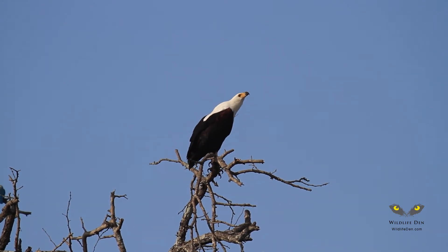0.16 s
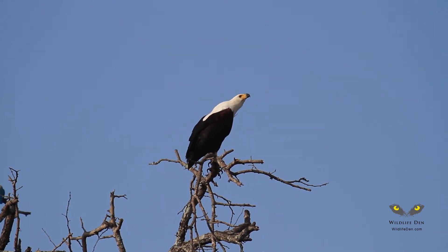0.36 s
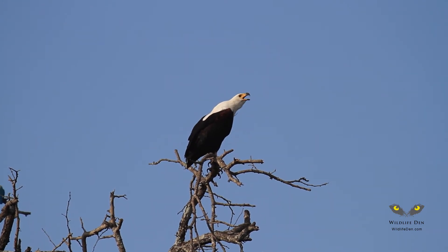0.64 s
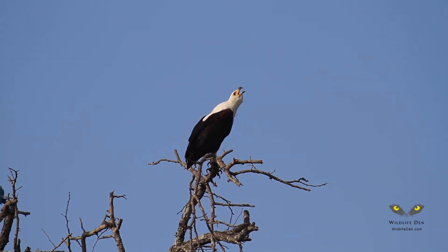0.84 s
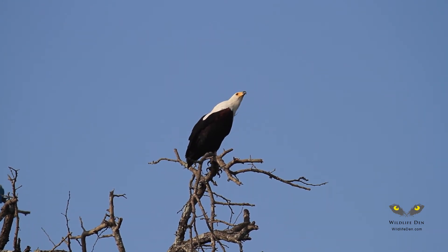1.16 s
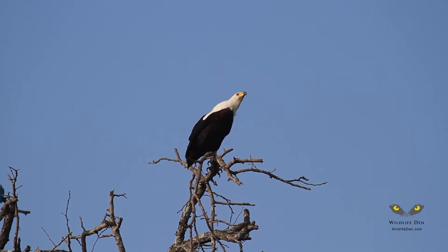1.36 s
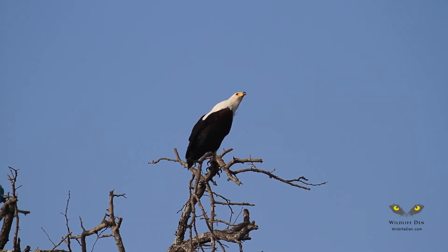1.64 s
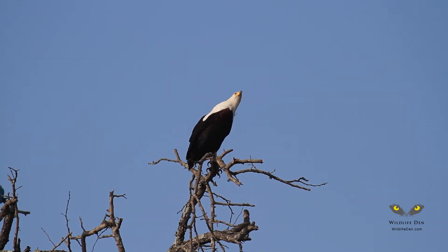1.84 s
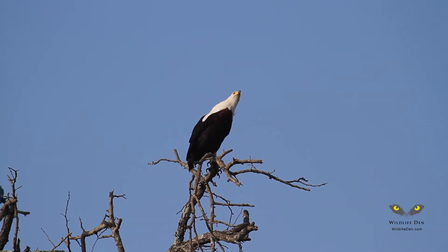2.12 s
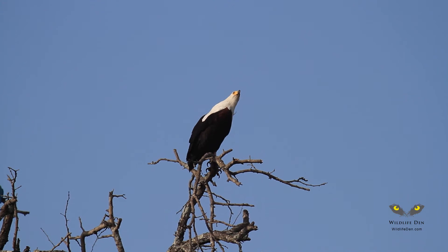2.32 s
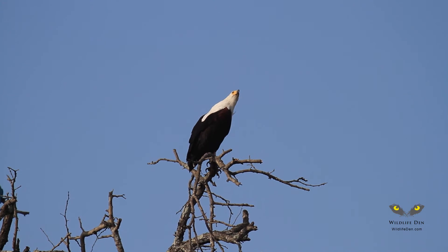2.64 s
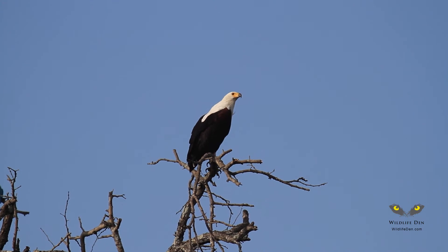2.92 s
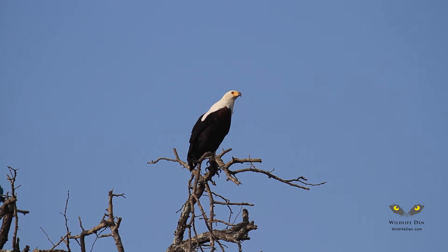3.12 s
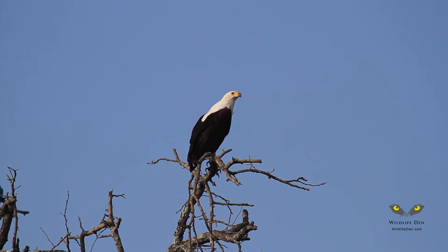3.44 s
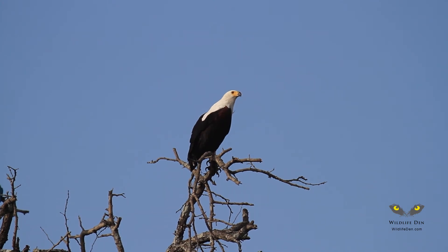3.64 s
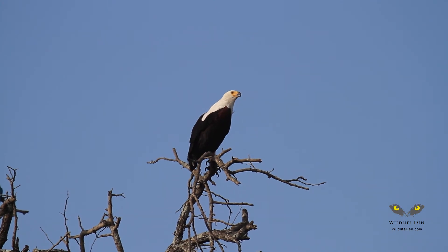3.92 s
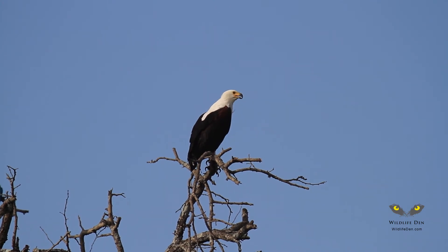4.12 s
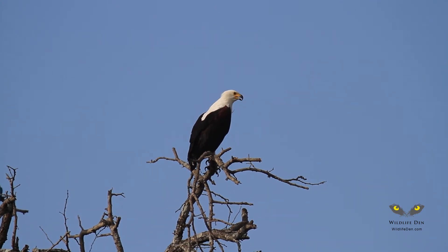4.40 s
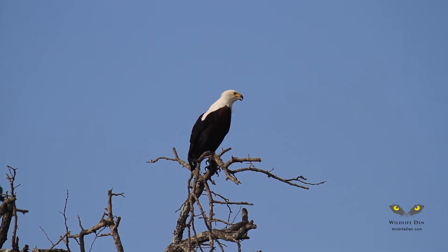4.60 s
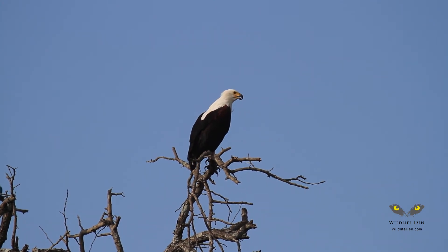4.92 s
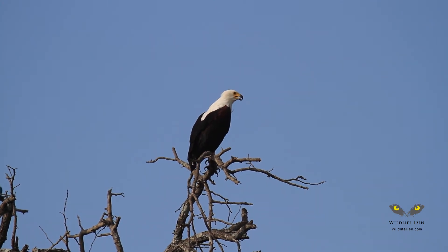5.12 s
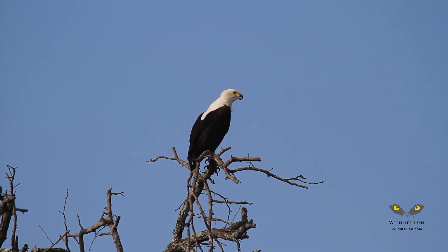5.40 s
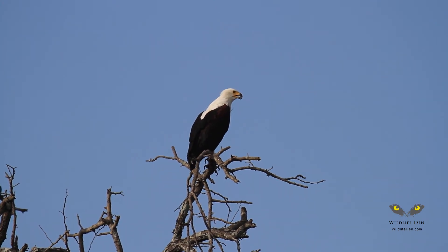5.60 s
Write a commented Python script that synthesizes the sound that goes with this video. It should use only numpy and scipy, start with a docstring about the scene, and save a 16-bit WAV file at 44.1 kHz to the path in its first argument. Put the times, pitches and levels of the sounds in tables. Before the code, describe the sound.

Outdoors in dry woodland, a close fish eagle gives a loud, raspy falling yelp at once, overlapped by its mate's higher, more echoing note. Twigs snap, then a second, longer yelp follows and fades among the trees. Afterward only a small bird's regular sharp chips, swelling katydid and cricket buzz, faint ticks and a low distant chorus remain. One mono microphone, the eagle near and nearly dry.

```python
"""A fish eagle close by throws a loud yelp, raspy as it starts, and its mate joins at once on a higher note; another follows.
Each falling yelp is a whistle with overtones through the throat; rasps are fluttering noise, and the woodland echoes them.
Throughout, a far low chorus throbs over a hiss of air, a katydid and crickets buzz in swells: shaped and banded noise.
Soon twigs snap (bursts of noise) and a small bird chips (plunging whistles), then high ticks join in.
Later a low drone rises and sinks, a faint whoop falls and a far bird peeps upward: gliding tones."""
import sys
import numpy as np
from scipy import signal
from scipy.fft import rfft, irfft, next_fast_len
from scipy.io import wavfile
from scipy.ndimage import uniform_filter1d, map_coordinates

SR = 44100
rng = np.random.default_rng(int(sys.argv[2]) if len(sys.argv) > 2 else 0)


def dump_mix(stems):
    """Bounce the given channels to the path in sys.argv[1] as a 16-bit WAV at rate SR."""
    frames = np.atleast_2d(stems).T  # one column per channel
    limited = np.clip(frames, -1, 1)  # hard clip at full scale
    pcm = np.round(limited * 32767).astype(np.int16)
    wavfile.write(sys.argv[1], SR, pcm)


N = 254016


def amp(db):
    """Decibels to gain."""
    return 10 ** (np.asarray(db) / 20)


def unit(x):
    """Scale to rms 1."""
    return x / np.sqrt(np.mean(x ** 2) + 1e-20)


def along(points, hz):
    """Read a curve of (Hz, value) points on a log frequency axis."""
    f, v = np.transpose(points)
    return np.interp(np.log(hz + 1), np.log(f + 1), v)


def curves(rows):
    """One value per sample for each column after the time."""
    s, *cols = np.transpose(rows)
    return [np.interp(np.arange(N) / SR, s, c) for c in cols]


def gate(rows, fade_s):
    """Open from a table's first row to its last, with soft edges."""
    t = np.arange(N) / SR
    opening = np.clip((t - rows[0][0]) / fade_s + .5, 0, 1)
    closing = np.clip((rows[-1][0] - t) / fade_s + .5, 0, 1)
    return opening * closing


def wobble(rate):
    """A smooth random curve, rate knots a second."""
    knots = rng.standard_normal(int(N * rate / SR) + 4)
    return map_coordinates(knots, [np.arange(N) * rate / SR])


def turns(hz):
    """Running phase [radians] of a frequency curve."""
    return 2 * np.pi * np.cumsum(hz) / SR


def filtered(x, response):
    """Shape the spectrum of x by a response of frequency."""
    size = next_fast_len(len(x) + SR // 4)
    spectrum = rfft(x, size) * response(np.fft.rfftfreq(size, 1 / SR))
    return irfft(spectrum, size)[:len(x)]


def noise(colour):
    """Noise of rms 1 with an (Hz, dB) spectrum."""
    return unit(filtered(rng.standard_normal(N), lambda hz: amp(along(colour, hz))))


def band(centre_hz, octaves, size):
    """Noise of rms 1 in a band that is bell-shaped over octaves."""
    def bell(hz):
        return np.exp(-.5 * (np.log2((hz + 1) / centre_hz) / octaves) ** 2)
    return unit(filtered(rng.standard_normal(size), bell))


def add(track, s, sound):
    """Mix a short sound in at time s."""
    start = max(round(s * SR), 0)
    track[start:start + len(sound)] += sound[:N - start]


def yelp(rows, throat, jitter, level_db, overtone_db, soften_db):
    """A nearly pure whistle of the syrinx; its wavering overtones slide through the throat's resonances."""
    pitch, fundamental_db, upper_db = curves(rows)
    on = gate(rows, fade_s=.012)
    live = on > 0
    pitch = (uniform_filter1d(pitch, size=700) * (1 + jitter * wobble(350)))[live]
    phase = turns(pitch)
    # as pressure and pitch sink the membranes close more softly and the high overtones go first
    slack = 1 - pitch / pitch.max()
    knots = np.arange(len(pitch)) * 50 / SR  # 50 changes of overtone strength a second
    overtones = 0
    for k in range(2, 15):
        waver_db = 3.5 * map_coordinates(rng.standard_normal(int(knots[-1]) + 4), [knots])
        strength_db = along(throat, k * pitch) - 9.4 * slack * max(k - 5, 0) + waver_db
        overtones = overtones + amp(strength_db) * np.sin(k * phase)
    voice = np.zeros(N)
    voice[live] = amp(fundamental_db[live] + level_db) * np.sin(phase)
    voice[live] += amp(upper_db[live] + overtone_db - soften_db * slack) * overtones
    return voice * on * amp(.5 * wobble(100))


def rasp():
    """Around the clean note the membranes flutter in uneven pulses; an open bill lets the bright part out."""
    # hoarse air as a yelp starts or breaks off: (time of peak [s], level [dB],
    # bright part before its trim [dB], rise [s], fall [s], flutter [Hz])
    hoarse_puffs = [(.005, -35, -5.5, 0.22, 0.13, 477), (0.179, -32, -10, 0.026, 0.026, 419.3),
                    (0.819, -33.5, 1, 0.032, .019, 410.7), (1.112, -51.5, 6, 0.032, 0.061, 430)]
    # spectra of the hoarse body and of the bright part: (frequency [Hz], level [dB])
    body_colour = [(500, -40), (750, -13.5), (950, -2), (1250, 1.5), (1520, -1), (1900, -25), (2500, -34),
                   (4000, -77)]
    bright_colour = [(1000, -39), (1900, 1.5), (2400, 1), (3000, -1.5), (4000, -1.5), (5000, -23),
                     (8000, -26), (12000, -19), (16000, -45)]
    fade_db = 19  # lost over one rise or fall time
    track, t = np.zeros(N), np.arange(N) / SR
    for s, db, bright_db, rise_s, fall_s, flutter_hz in hoarse_puffs:
        cycles = np.floor(np.cumsum(flutter_hz * (1 + .06 * wobble(300))) / SR)
        # one click a cycle, uneven in strength, with breath noise
        clicks = np.diff(cycles, prepend=0) * amp(5.5 * wobble(400))
        pulses = unit(clicks) + .5 * rng.standard_normal(N)
        body = unit(filtered(pulses, lambda hz: amp(along(body_colour, hz))))
        bright = unit(filtered(pulses, lambda hz: amp(along(bright_colour, hz))))
        distance = np.maximum((s - t) / rise_s, (t - s) / fall_s)
        shape = amp(db - fade_db * distance ** 2)
        track += shape * (body + amp(bright_db - 11.5) * bright)
    return track


def branch(x):
    """A branch by the perch mirrors the treble 4.2 ms late, so gliding overtones pass through notches."""
    def mirror(hz):
        treble = .55 * hz ** 4 / (hz ** 4 + 2200 ** 4)
        return treble * np.exp(-2j * np.pi * hz * .0042)
    return x + filtered(x, mirror)


def woods(x, build_s, near_share):
    """Nearby branches scatter first; a tree line answers a quarter second later, over a long thin tail."""
    # how long the woodland rings: (frequency [Hz], time to fall 60 dB [s])
    ring_times = [(300, 0.77), (1000, 1.98), (1400, 1.49), (2000, 2.44), (4000, 1.3), (10000, 0.33)]
    # tint of the echo: (frequency [Hz], gain [dB])
    echo_tint = [(300, 9), (1000, -4.5), (1350, -3), (2000, -4), (4000, -2), (10000, -4)]
    hz, t, z = signal.stft(rng.standard_normal(3 * SR // 2), SR, nperseg=256)
    tree_line = 1 + 0.48 * np.exp(-((t - .26) / 0.028) ** 2)
    far = tree_line * amp(-60 * t / along(ring_times, hz)[:, None])
    near = near_share * amp(-60 * t / 0.35)
    decay = (far + near) * (1 - np.exp(-t / build_s))
    tail = signal.istft(z * decay, SR, nperseg=256)[1]
    echo = signal.fftconvolve(x, tail / np.linalg.norm(tail))[:N]
    return filtered(echo, lambda f: amp(along(echo_tint, f)))


def eagles():
    """The near bird reaches the microphone almost dry, its mate with more and duller echo."""
    # yelps, levels before each voice's trim:
    # (time [s], pitch [Hz], fundamental [dB], overtones [dB])
    first_rows = [(0, 970, -63, -36), (.03, 960, -48, -45.5), (.06, 948, -26.5, -46),
                  (.1, 934.5, -23.5, -44.5), (.122, 866, -33, -46), (.145, 745, -34.5, -61),
                  (.175, 650, -43, -74)]
    second_rows = [(0.825, 981, -35, -37), (0.839, 1026, -23, -33), (0.849, 1046, -19.5, -43),
                   (0.873, 1054, -16.5, -38), (0.889, 1042, -19.5, -36), (0.903, 1012, -29, -35),
                   (0.915, 997.9, -22.5, -38.5), (0.927, 974, -33, -40), (0.951, 970, -33, -36),
                   (0.967, 952, -31.5, -44.5), (1.043, 932.7, -22, -35), (1.077, 874, -37.5, -43.5),
                   (1.091, 832, -31, -42.5), (1.113, 730.5, -39, -48), (1.15, 628.6, -47, -67)]
    mate_rows = [(.01, 1268, -38, -48.5), (.03, 1338, -38, -43.5), (.042, 1319, -24, -45.5),
                 (.07, 1333, -34, -46.5), (.11, 1318, -34.5, -45.5), (.14, 1288, -31, -49),
                 (.17, 1217, -29, -60), (.195, 1243, -50, -79)]
    # overtone strength through throat and open bill: (frequency [Hz], gain [dB])
    near_throat = [(1400, 13), (1900, 7.5), (2150, 6.5), (2500, 1), (2850, -16), (3150, -4), (3500, -4.5),
                   (3850, -1.5), (4300, -3.5), (4800, 0.5), (5800, -10.5), (7000, -12), (9000, -16.5),
                   (11500, -16.5), (15000, -35)]
    mate_throat = [(2600, 3), (3950, 7.5), (5300, -9), (6600, -7.5), (9000, -31), (15000, -36)]
    first = yelp(first_rows, near_throat, jitter=0.0037, level_db=0.5, overtone_db=-3.5, soften_db=5)
    second = yelp(second_rows, near_throat, jitter=0.0032, level_db=2, overtone_db=-6.5, soften_db=18)
    mate = yelp(mate_rows, mate_throat, jitter=0.01, level_db=2.5, overtone_db=-4.5, soften_db=1)
    hoarse = rasp()
    into_woods = amp(-8.5) * first + amp(-12) * second + amp(-3) * hoarse
    echo = woods(into_woods, build_s=0.014, near_share=2.24)
    dulling = [(1400, 1.0), (2600, -6.5)]  # (frequency [Hz], gain [dB])
    mate_echo = woods(mate, build_s=0.017, near_share=2.44)
    mate_echo = filtered(mate_echo, lambda hz: amp(along(dulling, hz)))
    return branch(first + second + hoarse) + mate + echo + mate_echo


def background():
    """A far-off low chorus throbs, with a cooing pitch in it, over a thin hiss of air."""
    # spectra of the chorus and of the air: (frequency [Hz], level [dB])
    chorus_colour = [(50, -38), (100, -23.5), (210, -16.5), (320, -9.5), (365, -5), (405, -8.5),
                     (442, -0.5), (475, -7), (520, -2), (590, -13), (660, -10.5), (740, -8), (880, -21),
                     (1050, -64), (2400, -82)]
    air_colour = [(25, -4.5), (65, 6.5), (130, 2), (900, 5.5), (1300, 5.5), (2100, 1), (3000, 0.5),
                  (4400, 0.5), (6200, -2.5), (7300, -0.5), (8000, -3), (10200, -4), (12700, -2),
                  (14200, -7.5), (15800, -9.5)]
    level_db, fade_db_per_s = -53.5, 0.33  # level at mid-scene, slow loss
    throb_db, throb_hz, throb_s = 1, 6.71, 0.12  # depth, rate, time of a crest
    t = np.arange(N) / SR
    throb = np.cos(2 * np.pi * throb_hz * (t - throb_s))
    waver_db = 1.1 * wobble(14)
    chorus_db = level_db - fade_db_per_s * (t - t.mean()) + throb_db * throb + waver_db
    coo = amp(-8.5 + 2.3 * wobble(5)) * band(439.5, 0.02, size=N)
    chorus = noise(chorus_colour) + coo
    return amp(chorus_db) * chorus + amp(-57.5) * noise(air_colour)


def bouts(length_s):
    """The katydid's envelope: a quick start, a slow swell up to each bout's end, a short release."""
    # where each bout breaks off: (time [s])
    bout_ends = [.78, 1.83, 2.98, 4.07, 5.14, 6.22]
    attack_s, release_s, swell_db_per_s = 0.054, 0.031, 1
    left = np.array(bout_ends)[:, None] - np.arange(N) / SR  # seconds to the end of each bout
    attack = np.clip((length_s - left) / attack_s, 0, 1)
    swell = amp(-swell_db_per_s * np.maximum(left, 0))
    release = np.exp(np.minimum(left, 0) / release_s)
    return np.sum(attack * swell * release, axis=0)


def katydid():
    """Wing strokes buzz in swelling bouts; late in each the wing rings out, a little higher in pitch."""
    # spectrum of the buzz: (frequency [Hz], level [dB])
    buzz_colour = [(4710, -24), (8000, -20.5), (8280, -13), (8450, -4), (8620, 1), (8720, -4.5), (8920, 5),
                   (9250, -11), (9500, -4.5), (9800, -26), (12700, -50), (21600, -120)]
    buzz_db, rest_db, ring_db = -64, -68, -60  # bout, between bouts, wing ring
    bout_s, ring_s = 0.814, 0.49  # length of a bout, and of the ringing last part
    strokes = 1 + .28 * np.sin(turns(77 * (1 + .01 * wobble(6))))  # about 77 strokes a second
    buzz = np.hypot(amp(buzz_db) * bouts(bout_s), amp(rest_db)) * noise(buzz_colour)
    wing = np.sin(turns(9055 + 60 * wobble(600)))
    return (buzz + amp(ring_db) * bouts(ring_s) * wing) * strokes


def crickets():
    """Crickets, heard as noise in one narrow band, swell and ebb together."""
    # tops of the swells: (time [s])
    swell_tops = [0.549, 1.15, 1.71, 2.3, 2.91, 3.58, 4.29, 4.86, 5.42]
    swell_db, rest_db, swell_s = -66.5, -76.5, .17
    t = np.arange(N) / SR
    swells = sum(np.exp(-((t - s) / swell_s) ** 2) for s in swell_tops)
    return (amp(swell_db) * swells + amp(rest_db)) * band(5030, 0.11, size=N)


def drone():
    """A low tone rises and sinks in one arch, louder the higher it is."""
    top_s, width_s, top_hz = 2.14, .87, 63
    top_db, db_per_octave = -64.5, 13
    # octaves relative to the top of the arch
    octaves = -((np.arange(N) / SR - top_s) / width_s) ** 2 / np.log(2)
    level_db = top_db + db_per_octave * octaves + 1.1 * wobble(9.9)
    return amp(level_db) * np.sqrt(2) * np.sin(turns(top_hz * 2 ** octaves))


def twigs_and_ticks():
    """Short decaying bursts of noise, each in its own band; nearby branches scatter chiefly their treble."""
    # dry snaps, knocks and rustles:
    # (time [s], starting level [dB], centre [Hz], width [octaves], time to fall 60 dB [s])
    snaps = [(.168, -40.5, 2700, 0.74, 0.028), (.227, -32.5, 4000, 1.5, 0.0041),
             (.2265, -33, 3080, 0.052, 0.019), (.228, -35.5, 410, 0.39, 0.043),
             (.245, -35, 2520, 0.27, 0.015), (.278, -29, 448.5, 0.467, 0.02), (.28, -49, 109.5, 0.46, .09),
             (0.29, -43.5, 3800, 0.48, .019), (2.065, -43.5, 1220, 0.67, 0.15),
             (2.068, -48, 7000, 1.1, 0.14), (2.709, -56.5, 1200, 0.44, 0.66),
             (2.783, -48, 1450, 0.17, 0.19), (2.78, -58.5, 2600, 0.28, 0.14),
             (4.175, -42, 11300, .43, 0.01), (4.444, -36.5, 11800, 0.17, .022),
             (4.4453, -33, 7000, 1.7, 0.012), (4.607, -39.5, 2580, 1.1, 0.019),
             (5.014, -50, 6400, .08, .022)]
    # faint high ticks: (time [s], starting level before the tick gain [dB])
    high_ticks = [(0.7414, -39), (1.2311, -40), (1.939, -35), (2.593, -42), (3.5848, -44), (3.9883, -43),
                  (4.3061, -41), (5.5593, -47)]
    tick_gain_db, tick_hz, tick_octaves, tick_t60_s = -8.5, 13800, 0.26, 0.019
    ticks = [(s, db + tick_gain_db, tick_hz, tick_octaves, tick_t60_s) for s, db in high_ticks]
    track, t = np.zeros(N), np.arange(SR // 4) / SR
    for s, db, centre_hz, octaves, t60_s in snaps + ticks:
        add(track, s, amp(db - 60 * t / t60_s) * band(centre_hz, octaves, size=len(t)))
    treble = filtered(track, lambda hz: hz / (hz + 1500))
    return track + amp(-3.5) * woods(treble, build_s=0.0021, near_share=6.1)


def small_bird():
    """Each chip is a whistle that plunges about an octave in a fortieth of a second."""
    # the chips: (time [s], level before a 0.5 dB lift [dB])
    chips = [(0.225, -57), (.61, -55.5), (1.472, -56), (1.849, -55), (2.223, -55), (2.603, -54.5),
             (2.958, -55), (3.319, -53), (3.698, -52.5), (4.066, -53), (4.565, -53), (4.935, -54),
             (5.297, -52), (5.646, -52)]
    track, t = np.zeros(N), np.arange(SR // 25) / SR
    for s, db in chips:
        life_s = .023 * np.exp(.1 * rng.standard_normal())
        shape = (1 - np.exp(-t / 0.00038)) * np.exp(-(t / life_s) ** 4)
        plunge = 5250 * np.exp(-t / .06) + 1500 * np.exp(-t / 0.00311)
        pitch = plunge * (1 + 0.0162 * rng.standard_normal())
        add(track, s, amp(db + 0.5) * shape * np.sin(turns(pitch)))
    return track + amp(2.5) * woods(track, build_s=0.0013, near_share=7.2)


def glide(rows):
    """A faint pure tone that slides in pitch and level."""
    pitch, level_db = curves(rows)
    return amp(level_db) * gate(rows, fade_s=0.028) * unit(np.sin(turns(pitch)))


def whoop():
    """A faint falling whoop: one gliding tone."""
    # (time [s], pitch [Hz], level [dB])
    whoop_rows = [(2.49, 233, -69), (2.52, 214, -55), (2.56, 165, -57.5), (2.6, 100, -66), (2.63, 85, -80)]
    return glide(whoop_rows)


def peep():
    """A far bird's rising peep: one gliding tone."""
    # (time [s], pitch [Hz], level [dB])
    peep_rows = [(4.0, 1920, -66), (4.02, 2510, -60), (4.035, 3080, -67)]
    return glide(peep_rows)


def scene():
    """Everything reaches one microphone."""
    birds = eagles() + small_bird() + peep()
    insects = katydid() + crickets()
    return (birds + insects + twigs_and_ticks() + drone() + whoop() + background())[None]


def record(dry):
    """The recorder keeps nothing from its band limit up."""
    top_hz = 15850
    return filtered(dry[0], lambda hz: hz < top_hz)[None]


dry = scene()
out = record(dry)
dump_mix(out)
```